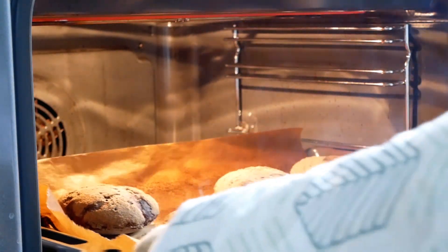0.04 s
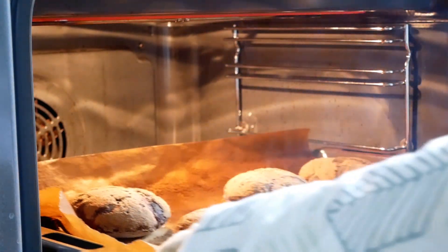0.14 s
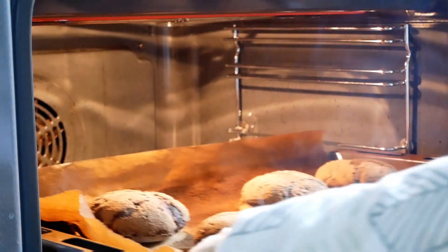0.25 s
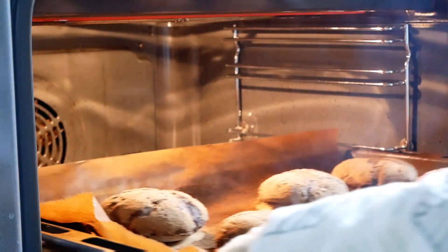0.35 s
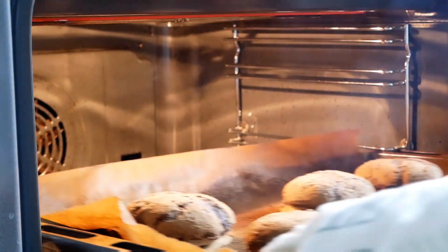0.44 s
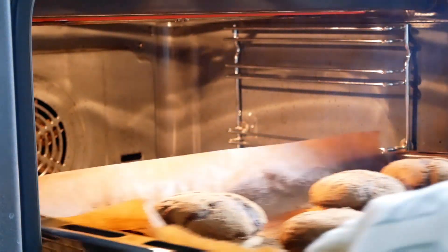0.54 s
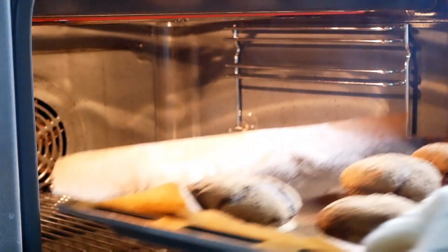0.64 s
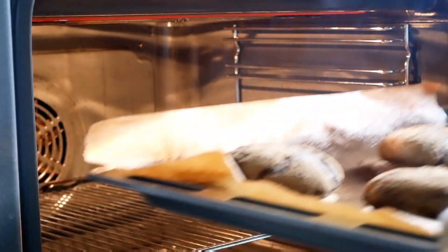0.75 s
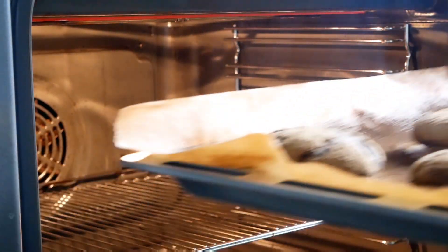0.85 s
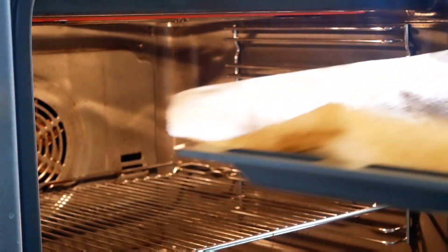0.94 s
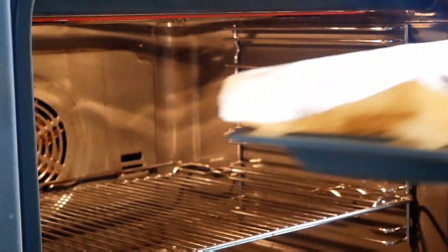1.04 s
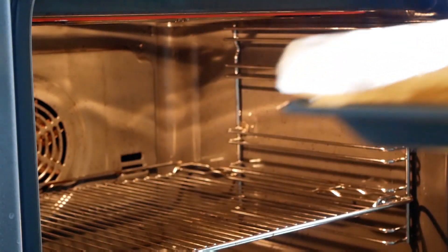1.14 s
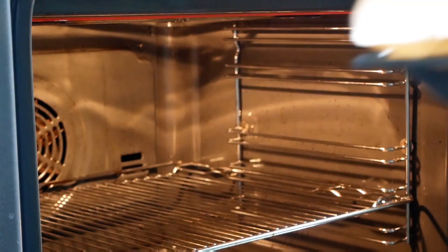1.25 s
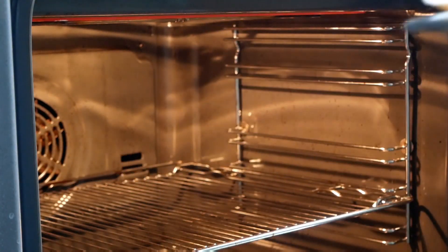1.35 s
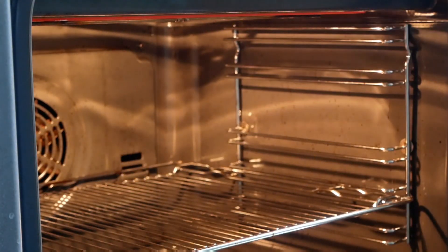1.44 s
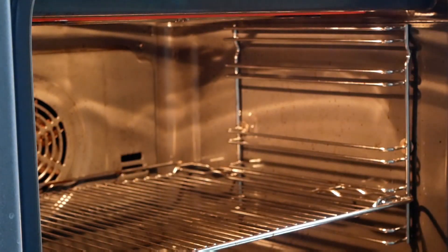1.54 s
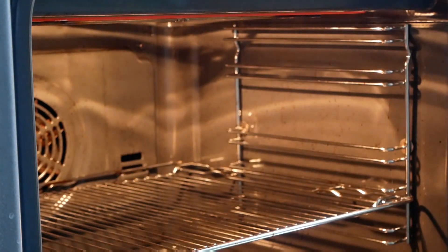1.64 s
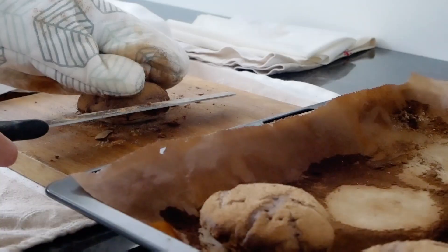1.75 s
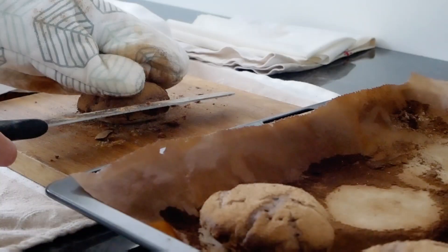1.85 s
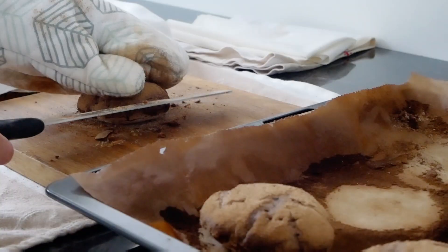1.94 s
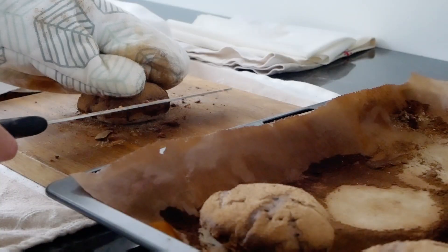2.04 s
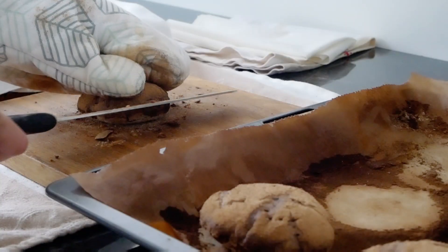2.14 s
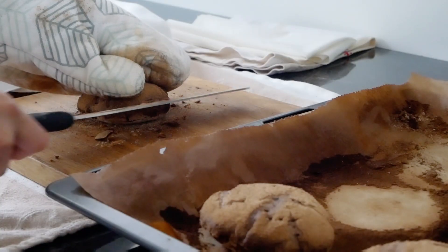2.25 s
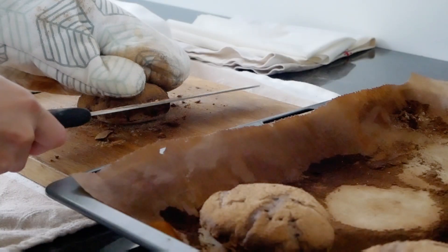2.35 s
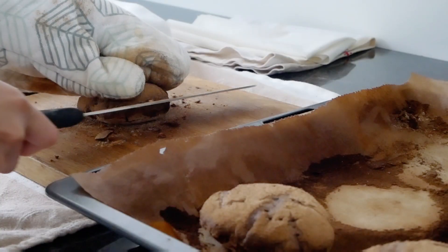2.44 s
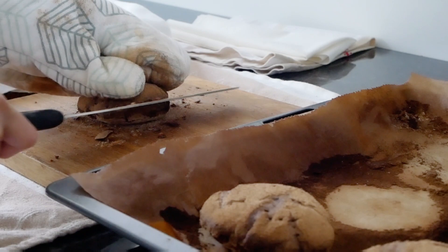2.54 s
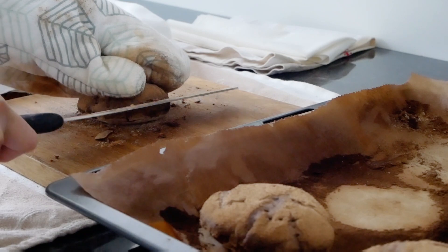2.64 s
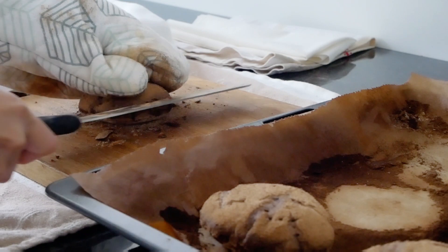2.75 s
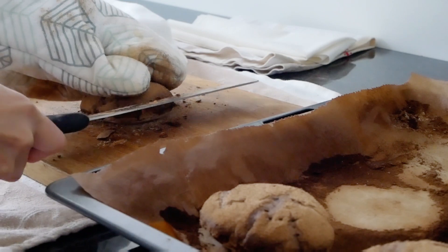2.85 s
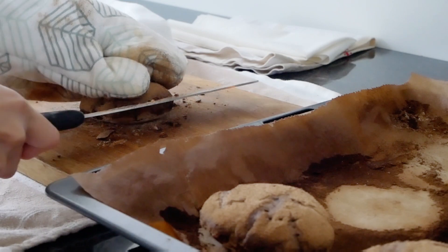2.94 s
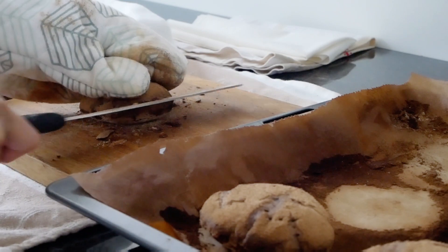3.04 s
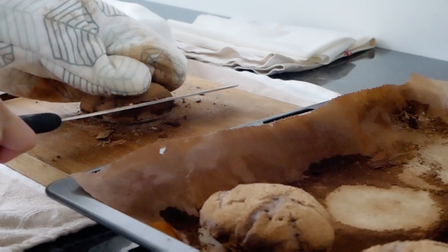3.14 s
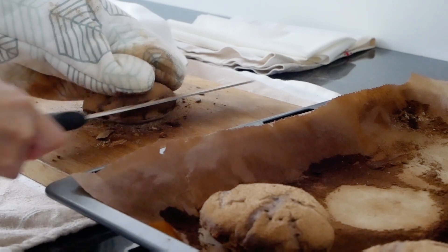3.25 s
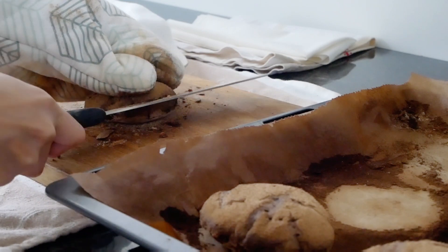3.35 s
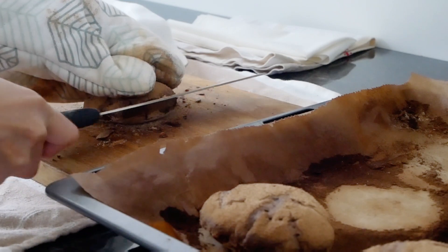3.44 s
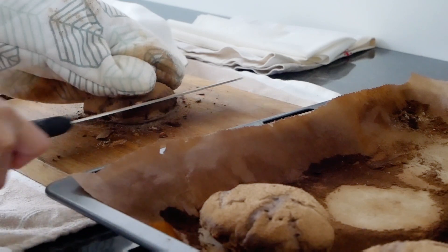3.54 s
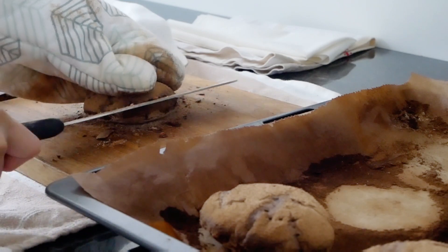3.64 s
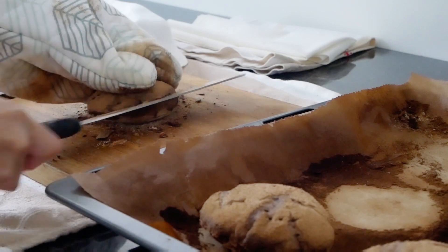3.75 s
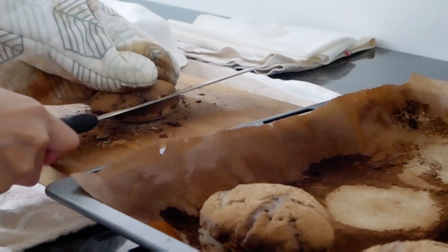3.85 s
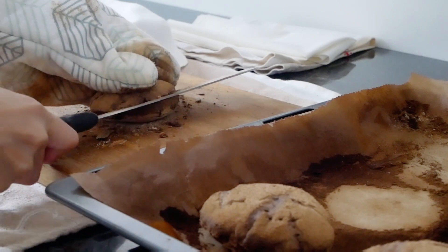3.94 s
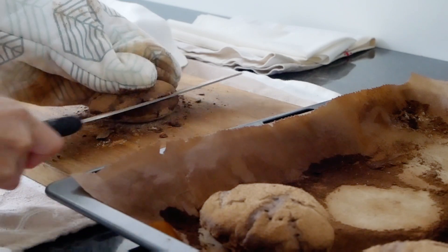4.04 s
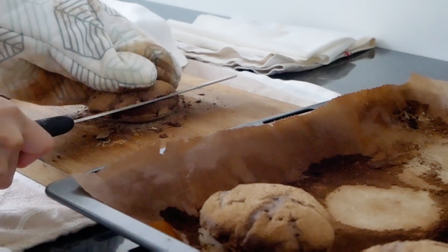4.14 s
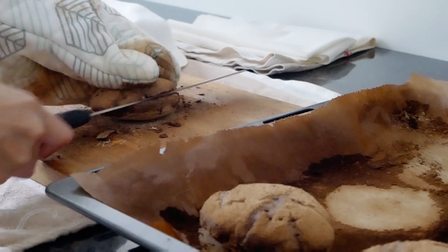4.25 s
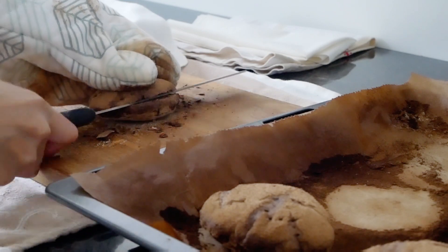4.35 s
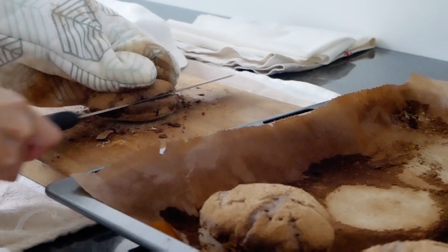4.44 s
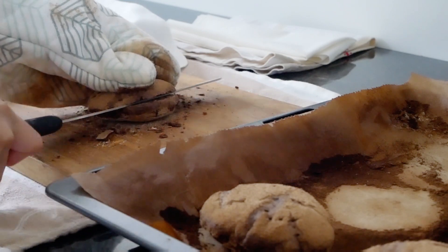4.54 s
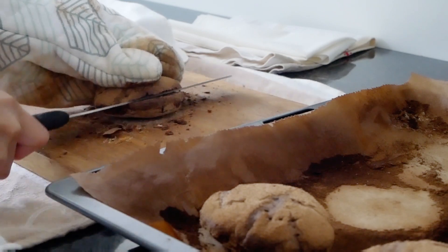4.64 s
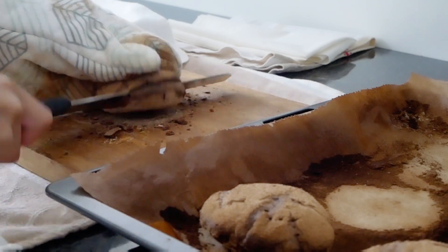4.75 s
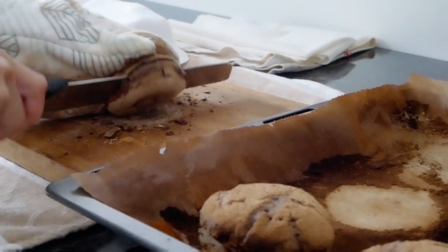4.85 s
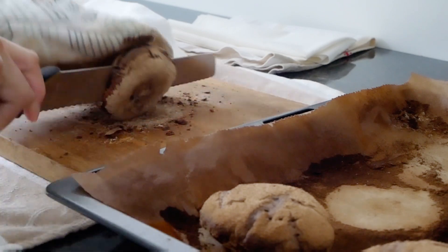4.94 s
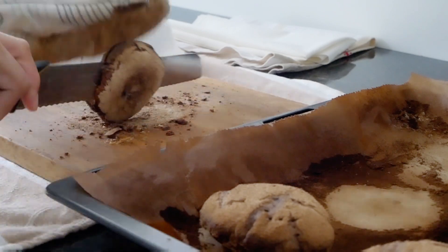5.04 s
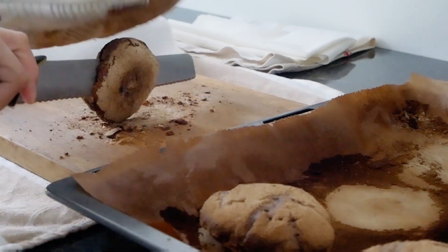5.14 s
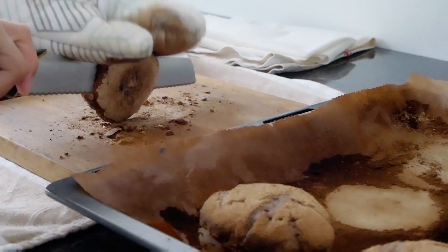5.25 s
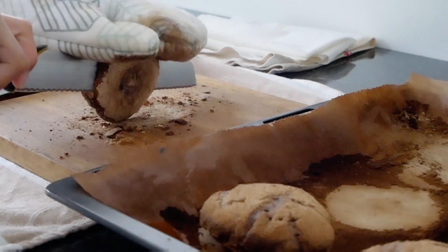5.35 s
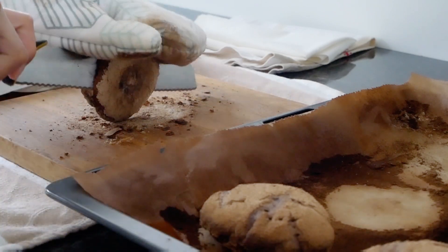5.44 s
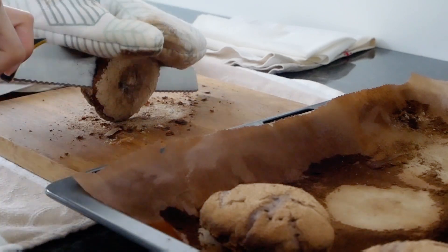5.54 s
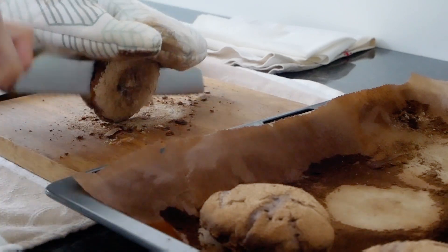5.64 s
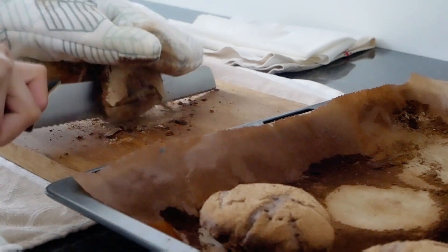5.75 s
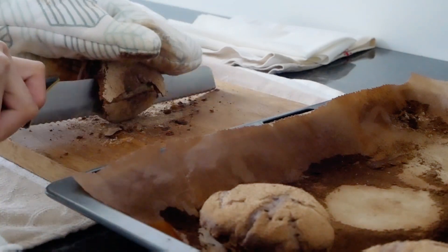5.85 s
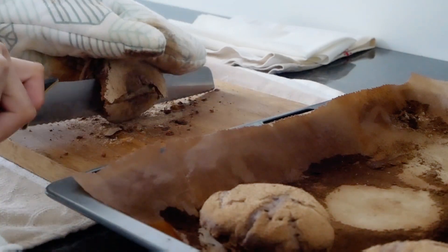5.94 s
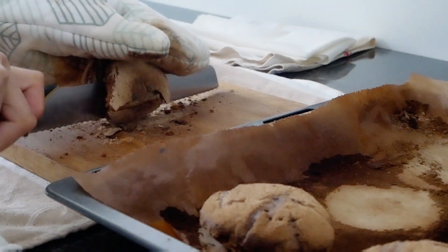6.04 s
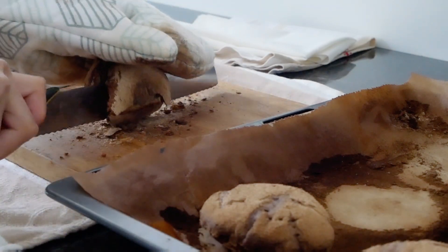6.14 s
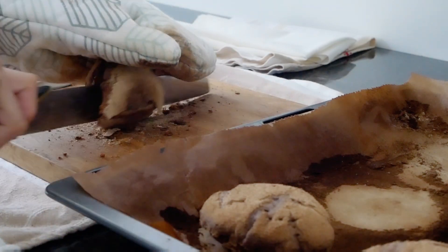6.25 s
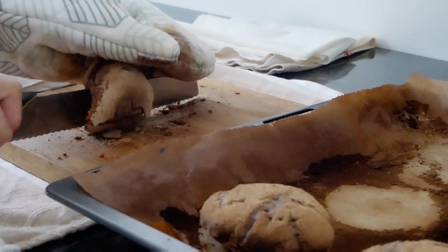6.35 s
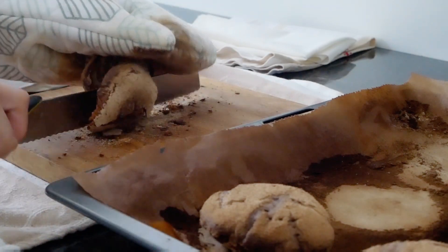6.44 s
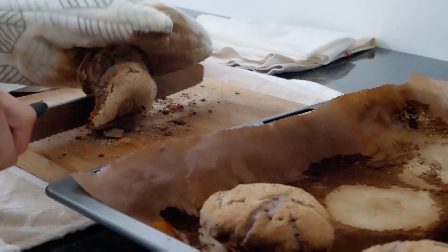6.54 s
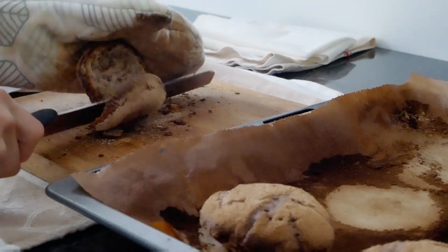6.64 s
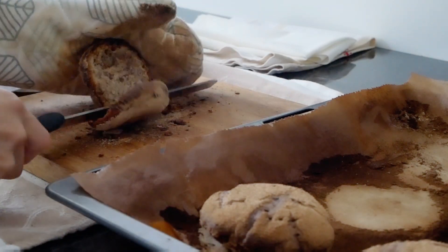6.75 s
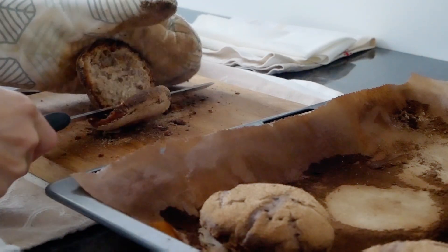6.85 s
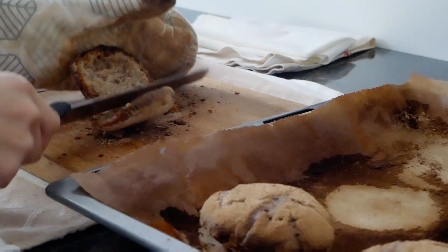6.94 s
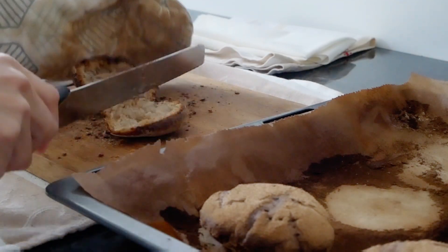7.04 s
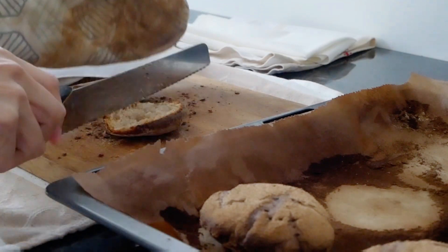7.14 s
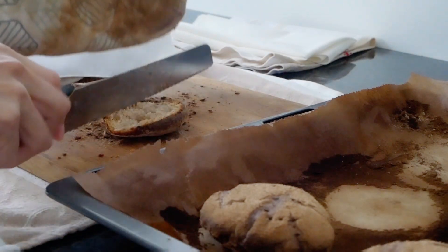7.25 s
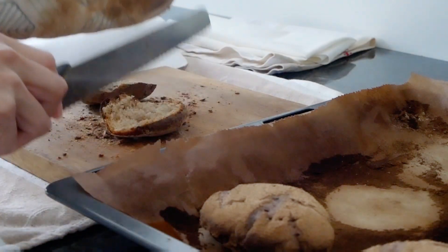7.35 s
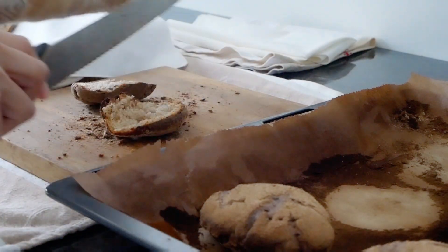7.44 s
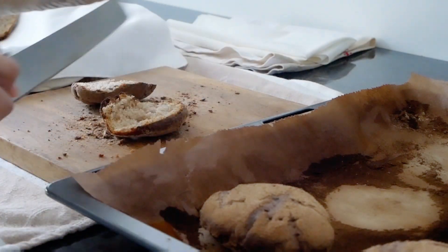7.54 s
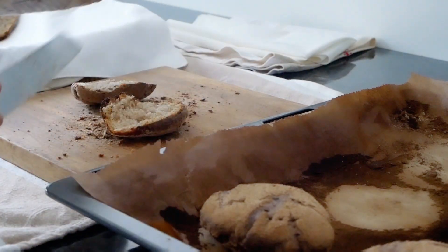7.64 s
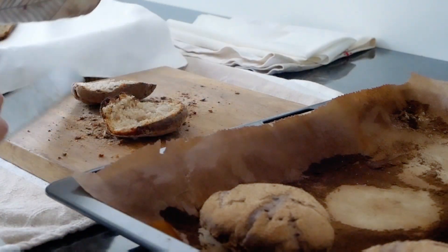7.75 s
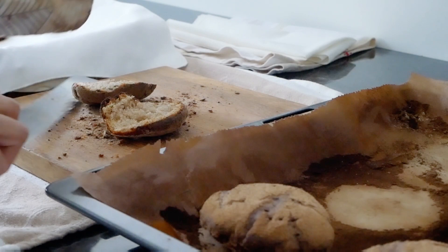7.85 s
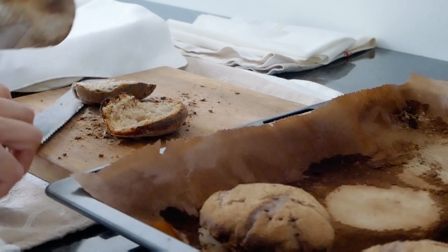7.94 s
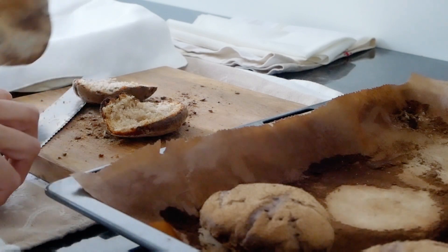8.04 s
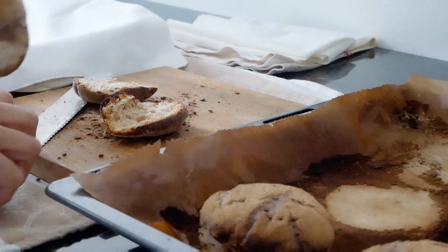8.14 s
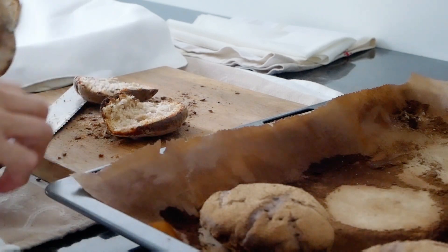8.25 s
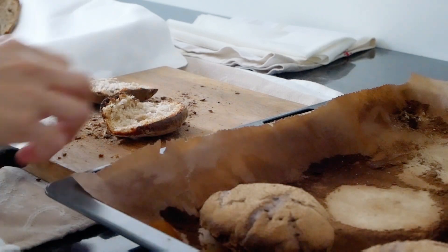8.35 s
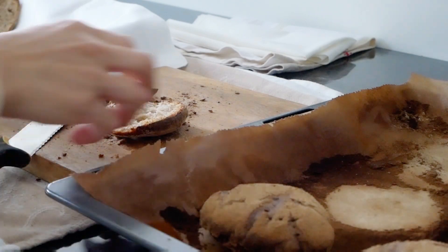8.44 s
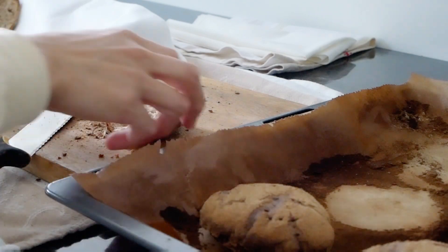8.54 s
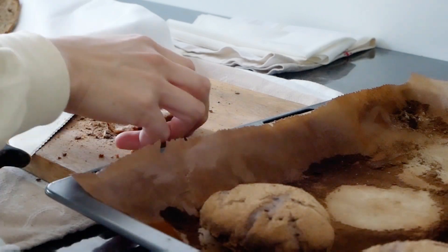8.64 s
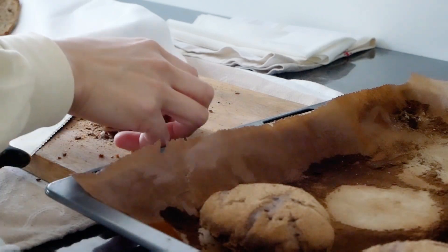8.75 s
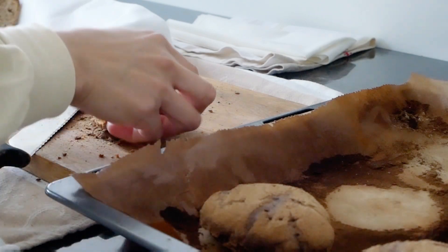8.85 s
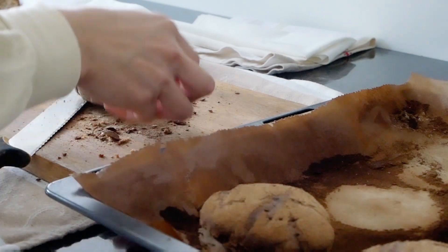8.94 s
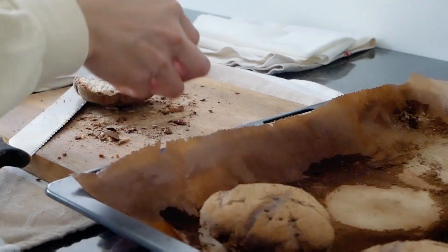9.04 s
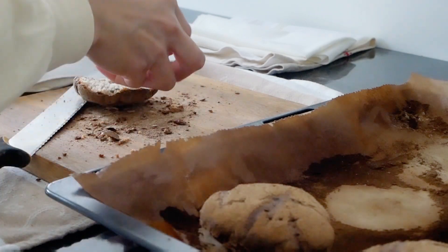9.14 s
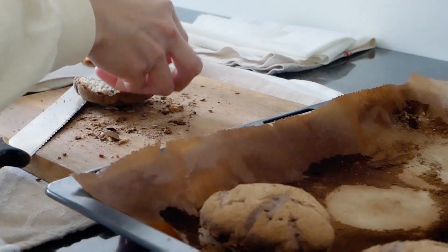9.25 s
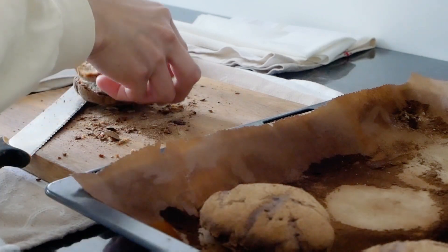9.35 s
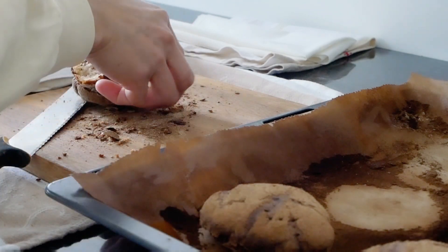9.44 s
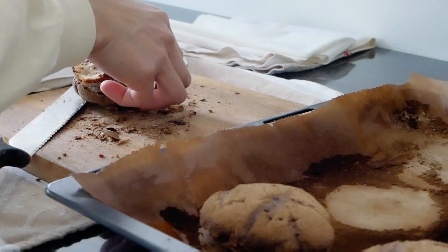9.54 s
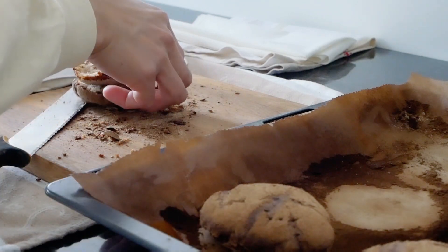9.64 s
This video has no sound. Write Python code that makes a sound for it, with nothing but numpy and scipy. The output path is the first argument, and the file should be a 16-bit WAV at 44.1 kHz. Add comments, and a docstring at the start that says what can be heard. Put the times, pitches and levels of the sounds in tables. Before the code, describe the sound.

Close, dry stereo sound in a small hard kitchen. From 0 s baking paper rustles and a metal tray scrapes on oven rails; it knocks at 0.15 s and bangs hardest at 0.5 s with a short ringing and hollow boom. Paper crackles on from 1.0 to 1.75 s, with snaps near 1.4 s, over a low oven rumble. At 1.77 s it cuts abruptly to a quieter room tone with faint brushing. From 2.3 to 4.9 s a serrated knife saws a crusty roll, starting softer, then in brisk alternating strong and weak strokes full of bright cracks, with blade rasp and woody resonance. Small ticks follow, then a sharp tearing crunch at 5.8 s and more crackling from 6.1 to 6.7 s. Bread drops with soft thuds around 7.2-7.5 s; a handle taps at 7.9 s and the knife clinks flat at 8.17 s. Faint hand and crumb touches end it near 9.6 s.

```python
"""Sawing and tearing a crusty roll after the oven

A metal tray with baking paper scrapes and bangs out of an oven, made from noise ticks, struck modes and paper snaps.
Then, at a wooden board, a serrated knife saws a crusty roll and the crust is torn: hails of tiny cracks, with
blade and board tones. Single cracks are short bursts. Bread, knuckles and the knife land on the board as blows.
A phone with two ports hears both from close by in a small hard kitchen, over a low steady rumble of shaped noise."""
import sys
import numpy as np
from scipy import signal
from scipy.fft import rfft, irfft, next_fast_len
from scipy.io import wavfile

SR = 44100
rng = np.random.default_rng(int(sys.argv[2]) if len(sys.argv) > 2 else 0)


def to_wav(sig):
    """Store sig (one row per channel, or 1-D mono) as 16-bit WAV at the path in sys.argv[1].

    Samples outside -1..1 are clipped; the rate is SR.
    """
    pcm = np.clip(np.atleast_2d(sig), -1, 1) * 32767
    pcm = np.round(pcm).astype(np.int16)
    wavfile.write(sys.argv[1], SR, pcm.T)  # frames by channels


N = 427329
SIZE = next_fast_len(N + SR)  # spare room at the end, for the tails
BINS_HZ = np.maximum(np.arange(SIZE // 2 + 1) * SR / SIZE, 1)
T = np.arange(N) / SR  # time in s

# Levels in the tables are those before the room and the final filters.

# knife strokes to and fro, then tearing of the crust from 5.77 s: (start_s, rise_s, hold_s, crust_db,
# blade_minus_crust_db, board_minus_crust_db, blade_favourite_hz, board_favourite_hz)
STROKES = [(2.308, 0.12, 0.053, -36, -3.5, 1.5, 1400, 312),
           (2.543, 0.071, 0.085, -38.5, -6.5, 3, 1700, 260), (2.736, 0.11, 0.13, -34, -11.5, -1, 1990, 427),
           (3.063, 0.11, 0.051, -37.5, -7, 3, 2000, 232), (3.314, 0.062, 0.11, -28, -7.5, -6, 2010, 325),
           (3.561, 0.086, 0.085, -34, -3, -2, 1760, 283), (3.815, 0.06, 0.11, -27.5, -4, -8, 1980, 360),
           (4.05, 0.1, 0.094, -34.5, -1.5, -1, 1840, 290), (4.316, 0.029, 0.091, -27.5, -4, -8, 1920, 380),
           (4.475, 0.11, 0.063, -35, 0, -3, 1840, 300), (4.729, 0.054, 0.0073, -31, -4, -10.5, 2050, 349),
           (4.869, 0.049, 0.046, -41.5, -0.5, -7, 1740, 300),
           (5.007, 0.031, 0.047, -48.5, -5, -3.5, 1760, 320),
           (5.773, 0.01, 0.044, -27, -4.5, -5, 1900, 403),
           (5.849, 0.0065, 0.011, -30.5, 0.5, -5, 1560, 420), (6.103, 0.023, 0.13, -47, 0, -3.5, 1700, 350),
           (6.267, 0.1, 0.024, -33.5, -4.5, -8, 1700, 396), (6.399, 0.035, 0.028, -36.5, -3, -7, 1670, 400),
           (6.543, 0.034, 0.12, -48, -2.5, -4, 1660, 345)]
# mitt, hands and crumbs brushing roll and board:
# (start_s, rise_s, hold_s, crust_db, blade_minus_crust_db, board_minus_crust_db)
TOUCHES = [(1.854, 0.0095, 0.0071, -62, 6, 15), (1.944, 0.053, 0.15, -65, -13, 10.5),
           (5.145, 0.019, 0.025, -56.5, 3.5, 3), (5.3, 0.13, 0.081, -61, -1, 2),
           (5.56, 0.049, 0.12, -60, -6, -13), (5.919, 0.029, 0.027, -43, 3, 0),
           (6.734, 0.013, 0.17, -56, 0.5, -3), (6.95, 0.067, 0.17, -63, 2, -1),
           (7.192, 0.029, 0.17, -57, -2, 5.5), (7.42, .05, 0.021, -67, 7.5, 12),
           (7.921, 0.011, 0.036, -63.5, 11, 25), (8.02, 0.086, 0.058, -56.5, -3, 6),
           (8.16, 0.0064, 0.0063, -46.5, -8, -3), (8.79, 0.035, 0.037, -59.5, 0.5, -1),
           (8.945, 0.012, 0.021, -62.5, -6.5, 3), (9.458, 0.066, 0.024, -65.5, 6, 9),
           (9.566, 0.012, 0.0082, -64, 9, 15)]
# how fast treble, middle and bass die away when a movement stops: (treble, middle, bass), all in dB per s
STROKE_FALL_DB_S = (276.5, 179.5, 159)
TOUCH_FALL_DB_S = (158, 86, 95)
# colour of the breaking crust: (pitch_hz, level_db per Hz)
CRUST = [(1760, -32), (3000, -1.5), (3750, 1.5), (5080, 0.5), (6110, -3.5), (7070, 3.5), (9020, 4.5),
         (12200, -9.5), (12600, -38), (13000, -99)]
# ringing tones of the blade and of the wooden board: (pitch_hz, level_db, t60_s)
BLADE_MODES = [(825, 1, 0.011), (1190, -4, 0.0092), (1435, 2.5, 0.0072), (1780, -3.5, 0.0078),
               (2136, 6, 0.0041), (2540, 3.5, 0.0051)]
BOARD_MODES = [(139, -15, 0.08), (199, -18, 0.032), (244, 2.5, 0.035), (276, -0.5, 0.073), (316, 9, 0.058),
               (410, 7.5, 0.06), (494, 11.5, 0.03), (584, 6.5, 0.054), (735, -14, 0.053),
               (907, -13.5, 0.028)]


def sawing_and_tearing():
    """The crust breaks in a hail of tiny cracks; the same movements shake blade and board."""
    strokes = np.array(STROKES)
    stroke_gains = movements(strokes[:, :6], STROKE_FALL_DB_S)
    touch_gains = movements(TOUCHES, TOUCH_FALL_DB_S)
    crust_gain, blade_gain, board_gain = np.hypot(stroke_gains, touch_gains)
    blade_hz, board_hz = strokes.T[6:]

    breaks = grains(per_s=900., spread_db=3.5, bed_db=5.5, t60=0.005, fill_db=-6.5, apart=0.31)
    # blade layer delayed 3 ms so the two bands add without cancelling
    delayed = np.roll(breaks, SR // 300, axis=1)
    # the soft crumb passes only a smeared push down to the wood
    push = grains(per_s=520.0, spread_db=-0.5, bed_db=11.5, t60=0.039, fill_db=-14.5, apart=0)[0]

    crust = through((crust_gain * breaks, causal(CRUST)))
    saw = patchy(crust, split_hz=5400.0, shift_db=2.54, per_s=30.)
    saw += driven(blade_gain * delayed, BLADE_MODES, blade_hz, octave_db=13.8, shift_db=3.44, per_s=14.)
    saw += driven(board_gain * push, BOARD_MODES, board_hz, octave_db=7.6, shift_db=1.1, per_s=7.4)
    top_cut = signal.butter(16, 12500, fs=SR, output="sos")  # Hz
    return signal.sosfilt(top_cut, saw)


def driven(push, modes, near_hz, octave_db, shift_db, per_s):
    """Each movement favours the modes near one pitch; each mode's level also wanders at random."""
    stroke = np.maximum(np.searchsorted(np.transpose(STROKES)[0], T) - 1, 0)  # number of the latest movement
    out = 0
    for hz, db, t60 in modes:
        pole = 1000. ** (-1 / t60 / SR) * np.exp(2j * np.pi * hz / SR)
        octaves_away = np.abs(np.log2(hz / near_hz))
        level_db = (db - octave_db * octaves_away)[stroke] + shift_db * wander(per_s)
        # this two-pole filter rings at hz and dies away over t60
        out = out + signal.lfilter([0, pole.imag], [1, -2 * pole.real, abs(pole) ** 2], push * undb(level_db))
    energy = sum(undb(2 * db) * t60 * SR / 4 / np.log(1000) for _, db, t60 in modes)
    return out / np.sqrt(energy)


# single crust cracks, loud and faint: (time_s, peak_db, deep_part_minus_peak_db)
CRACKS = [(1.8731, -37, -1), (1.887, -42, -9), (1.9624, -48, -9), (2.2024, -49, -9), (2.2734, -33, -16),
          (2.3175, -37, -12), (2.3485, -33, -19), (2.3825, -22, -8), (2.4037, -17, -16), (2.4385, -11, -18),
          (2.548, -31, -7), (2.607, -17, -10), (2.7117, -14, -17), (2.8479, -29, -15), (2.8742, -21, -14),
          (2.8938, -15, -7), (2.944, -14.5, -9), (3.1116, -22, -9), (3.1542, -21, -14), (3.305, -26, -6),
          (3.3352, -27, -9), (3.3507, -17, -20), (3.401, -8, -16), (3.4484, -13.5, -9), (3.473, -22, -9),
          (3.503, -23, -9), (3.6077, -22.5, -1), (3.63, -22.5, 0.5), (3.7758, -18.5, -9), (3.833, -22, 0),
          (3.86, -16, -8), (3.8711, -20, -4), (3.912, -11.5, -0.5), (3.9442, -13, -6), (3.9646, -11, -1),
          (3.9769, -12.5, -0.5), (4.14, -24, -4), (4.157, -22, -13), (4.2085, -18, -3), (4.329, -11.5, -3),
          (4.3457, -13, -12), (4.3528, -21, -9), (4.3774, -12, -6), (4.4053, -15.5, -7.5), (4.411, -19, -6),
          (4.5689, -30, -4), (4.6244, -20, -3), (4.701, -21.5, -5), (4.7726, -11, -8), (5.0293, -30, -12),
          (5.1753, -39, -5), (5.2012, -35, -9), (5.417, -42, -9), (5.6048, -30.5, -9), (5.6305, -35.5, -7),
          (5.665, -40, -9), (5.6799, -35, -9), (5.7615, -37.5, -10.5), (5.7725, -13, -11.5),
          (5.7845, -12, -14), (5.8008, -23, -12.5), (5.8086, -12.5, -7.5), (5.813, -11, -12),
          (5.8169, -9, -6), (5.8615, -13, -9), (5.889, -8.5, -11.5), (5.9524, -27, 0), (6.133, -31, -3),
          (6.157, -12.5, -6), (6.18, -28, -11), (6.208, -25.5, -6), (6.2408, -28, -9), (6.2893, -26.5, -3),
          (6.299, -31, -9), (6.3183, -23, -10), (6.371, -20, -9.5), (6.389, -17, -14), (6.3943, -12, -9),
          (6.4233, -30, -9), (6.436, -19.5, -12), (6.451, -16, -12), (6.463, -14, -11), (6.604, -21.5, -9),
          (6.6394, -20, -9), (6.6644, -20, -8.5), (6.7064, -26, -15), (6.8273, -36, -9), (6.8991, -39, -7),
          (7.2172, -34.5, -7), (7.2545, -36.5, -2), (7.3199, -20.5, -6.5), (7.9357, -42, -13),
          (7.9773, -48, -12), (8.053, -37, -11), (8.1695, -20, -12), (8.8428, -49, -6), (8.956, -45, -9),
          (9.5238, -48, -11), (9.5777, -40, -3)]
# colours of the sharp snap and of the deeper split: (pitch_hz, level_db per Hz)
SNAP_OF_CRUST = [(2500, -29), (4200, -7), (6060, -2), (8390, 12.5), (10700, 0), (12300, -9), (13300, -51)]
SPLIT_OF_CRUST = [(530, -6), (1000, -2.5), (2000, 0), (4000, 4.5), (6000, 3), (9000, -35)]


def crust_cracks():
    """The crust gives way: each crack is a sharp snap together with a deeper split."""
    s, db, deep_db = np.transpose(CRACKS)
    splinter_t60_s = 0.009
    snap = blows(s, db, causal(SNAP_OF_CRUST), splinter_t60_s, fill_db=-9.5)
    split = blows(s, db + deep_db, causal(SPLIT_OF_CRUST), splinter_t60_s, fill_db=6.0)
    return snap + split


# bread, knife handle and knuckles landing on the board:
# (time_s, peak_db, sharp_edge_minus_peak_db, tumble_t60_s, contact_s)
KNOCKS = [(6.95, -44, 6, 0.024, 0.001), (7.222, -40, -14, .04, 0.0013), (7.236, -31, -20, 0.03, 0.00086),
          (7.32, -26, -11, 0.026, 0.002), (7.352, -32, -18, 0.024, 0.0015), (7.411, -35, -10, .04, .0012),
          (7.453, -35.5, -18, .02, 0.0013), (7.936, -32.5, -6, 0.033, 0.00026),
          (7.967, -42, -24, .03, 0.0015), (8.008, -39, -7, 0.079, .0012),
          (9.578, -46.5, 7.5, 0.058, 0.0012), (9.6, -48, 3, 0.031, .0012)]


def board_knocks():
    """A landing wakes the board most near one pitch; a longer contact softens it; its sharp edge uses blade tones."""
    favourite_hz, octave_db = 290, 32  # modes lose this many dB per octave away from the favourite
    woken = [(hz, db - octave_db * abs(np.log2(hz / favourite_hz)), t60) for hz, db, t60 in BOARD_MODES]
    s, db, edge_db, t60, contact = np.transpose(KNOCKS)
    thud = blows(s, db, ring(woken), t60, fill_db=-15.0, contact=contact)
    edge = blows(s, db + edge_db, ring(BLADE_MODES), t60, fill_db=-7.0)
    return thud + edge


# the knife landing flat on the board, then one bounce: (time_s, peak_db)
LAID = [(8.169, -25), (8.181, -34)]
# ringing tones of the whole knife: (pitch_hz, level_db, t60_s)
KNIFE_MODES = [(175, -1, 0.15), (1180, -10, 0.018), (1470, -10, 0.023), (3140, -6, 0.022), (5790, -21, 0.2),
               (5670, -16, 0.22), (6760, -14, 0.11), (7063, -20.5, .23), (7750, -21, .2), (8425, -34, .2),
               (8931, -28, 0.16), (9100, -5.5, 0.044)]


def knife_laid_down():
    """The knife is laid flat and bounces once; each hit sets its metal ringing."""
    s, db = np.transpose(LAID)
    return blows(s, db, ring(KNIFE_MODES), 0.011, fill_db=-2.0)


# pulls of the tray and rustles of its paper:
# (start_s, rise_s, hold_s, paper_db, rails_minus_paper_db, oven_body_minus_paper_db)
PULLS = [(-.03, 0.038, 0.017, -39.5, 1.5, -1.5), (.09, 0.061, 0.024, -34, 0, -3.5),
         (.2, 0.07, 0.077, -44, 7.5, -0.5), (.32, 0.064, 0.011, -41.5, 10.5, -18),
         (.506, 0.002, 0.045, -29.5, 0.5, -0.5), (.6, 0.029, 0.071, -38.5, 2.5, 0),
         (.8, 0.027, 0.052, -57, 6.5, 11), (.98, 0.12, 0.035, -38, -0.5, -6),
         (1.17, 0.072, 0.07, -35.5, -5, -10.5), (1.31, 0.073, 0.041, -30, -4, -17),
         (1.585, 0.019, 0.0095, -37, -2.5, -6.5), (1.68, 0.075, .04, -35.5, -7.5, -8)]
# how fast a pull dies away once it stops: (treble, middle, bass), all in dB per s
PULL_FALL_DB_S = (174, 161, 76)
# colours of the baking paper, the rails and the oven body: (pitch_hz, level_db per Hz)
PAPER = [(2060, -2.5), (3500, 8), (4740, 10), (6650, 10.5), (7230, 8.5), (9340, 14), (10800, 10),
         (13300, -4), (14000, -10.5), (14500, -25)]
RAILS = [(610, -21.5), (910, -3), (1270, 0), (2170, 1), (2800, 0.5), (4300, -8), (7100, -25.5),
         (12100, -73)]
OVEN_BODY = [(35, -56.5), (60, 1.5), (140, 2), (204, -15), (253, -4), (655, -4.5), (718, -8), (900, -7.5),
             (1170, -29.5), (1980, -120)]


def tray_scraping():
    """Rails and paper rub in dense slips, which also shake the oven body."""
    size = 2 * SR
    paper_gain, rails_gain, body_gain = (gain[:size] for gain in movements(PULLS, PULL_FALL_DB_S))
    slips = grains(per_s=700.0, spread_db=1.0, bed_db=4.0, t60=0.0096, fill_db=-12.0, apart=0.22, size=size)
    # rails layer delayed 3 ms so it adds to the paper without cancelling
    delayed = np.roll(slips, SR // 300, axis=1)
    paper = through((paper_gain * slips, causal(PAPER)))
    metal = through((rails_gain * delayed, causal(RAILS)), (body_gain * slips, causal(OVEN_BODY)))
    return patchy(paper, split_hz=5100.0, shift_db=2.6, per_s=20.56) + metal


# tray knocking on rails and rack: (time_s, ring_peak_db, clack_minus_ring_db, boom_minus_ring_db)
BANGS = [(0.1431, -14, -7, -35), (0.5094, -14, 3.5, -9.5), (0.5442, -18, -11.5, -8),
         (0.593, -35.5, -8, 9.5), (0.8269, -34, 2, -21), (1.3762, -35, 11, -33.5),
         (1.4115, -33, -22, -40.5), (1.5986, -36, -2, -18)]
# ringing tones of the tray: (pitch_hz, level_db, t60_s), lowest first
TRAY_MODES = [(145.5, -6.5, 0.21), (263, -5, 0.49), (305, -3.5, 0.077), (590, -9, 0.46), (658, -12, 0.31),
              (727, -5, 0.067), (1240, -0.5, .15), (1360, 8.5, 0.061), (1750, 0.5, 0.054), (2440, -9, 0.04),
              (2580, 9, 0.074), (2960, 7, 0.087), (3147, 13, 0.037)]


def tray_bangs():
    """At every knock the sheet rings, rails and paper clack, and the six lowest tones of the sheet boom."""
    s, db, clack_db, boom_db = np.transpose(BANGS)
    ringing = blows(s, db, ring(TRAY_MODES), 0.03, fill_db=17.0)
    clack = blows(s, db + clack_db, causal(RAILS) + causal(PAPER), 0.071, fill_db=0.5)
    boom = blows(s, db + boom_db, ring(TRAY_MODES[:6]), 0.05, fill_db=38.0)
    return ringing + clack + boom


# snaps of the baking paper: (time_s, peak_db)
SNAPS = [(0.0246, -22), (0.121, -19.5), (0.144, -11), (0.512, -14.5), (0.5424, -12.5), (1.0786, -26),
         (1.099, -21.5), (1.147, -20), (1.217, -26), (1.26, -19), (1.3054, -22), (1.374, -12.5),
         (1.4119, -11.5), (1.595, -17), (1.613, -21), (1.66, -28), (1.7105, -31), (1.731, -22.5)]


def paper_snaps():
    """Baking paper snaps: short bursts in the colour of the paper."""
    s, db = np.transpose(SNAPS)
    return blows(s, db, causal(PAPER), 0.03, fill_db=-8.0)


def movements(rows, falls_db_s):
    """Gains for treble, middle and bass: every movement rises, holds, falls and leaves a fainter, longer trickle."""
    rise_db = 17  # climb from the start of a movement to its full level
    trickle_db, trickle_fall_db_s = -14, 65
    power = np.zeros((3, N))
    for start, rise, hold, top_db, mid_db, low_db in rows:
        rise = max(rise, .002)
        # a faint climb begins before the start
        span = slice(max(int((start - 3 * rise) * SR), 0), int((start + rise + hold + 1) * SR))
        climb_db = rise_db * np.minimum((T[span] - start) / rise - 1, 0)
        after = np.maximum(T[span] - start - rise - max(hold, 0), 0)  # s since the movement stopped
        fall = undb(-2 * np.outer(falls_db_s, after))
        fall = fall + undb(2 * (trickle_db - trickle_fall_db_s * after))
        levels_db = top_db + np.array([0, mid_db, low_db])
        power[:, span] += undb(2 * np.add.outer(levels_db, climb_db)) * fall
    return np.sqrt(power)


def grains(per_s, spread_db, bed_db, t60, fill_db, apart, size=N):
    """Random ticks of varied strength, each with a fresh tail of splinters, over an even bed of rubbing."""
    chance = rng.random((3, size))
    happens = chance[0] < per_s / SR
    strength = undb(-spread_db * np.log(chance[2] + 0.024))
    ticks = unit(happens * strength)
    sign = np.sign(chance[1] - .5)
    tail_power = signal.lfilter([1], [1, -1000. ** (-2 / t60 / SR)], ticks ** 2)
    # the rubbing is spread over a width, so a share of it differs between the two ports
    mid, side = rng.standard_normal((2, size))
    hiss = mid + apart * side * np.array([[1], [-1]])
    hiss_gain = np.sqrt(undb(2 * fill_db) * tail_power + undb(2 * bed_db))
    return unit(ticks * sign + hiss_gain * hiss)


def burst(t60, fill_db):
    """One break: a sharp tick and a short tail of splinters."""
    t = T[:SR // 4]
    tail = undb(fill_db) * rng.standard_normal(len(t)) * 1000. ** (-t / t60)
    tail[0] = 1
    return tail


def blows(times, peak_db, body, t60, fill_db, contact=0.):
    """Each blow has its own burst, softened by the contact time, coloured by the body and set to its peak."""
    out = np.zeros(N + 2 * SR)
    for s, db, fade, soft in np.broadcast(times, peak_db, t60, contact):
        fade = max(fade, .002)
        cushion = np.hanning(max(int(soft * SR), 0) + 3)[1:-1]
        force = np.convolve(burst(fade, fill_db)[:int(fade * SR) + 2], cushion)
        hit = signal.fftconvolve(force, body)
        i = int(s * SR)
        out[i:i + len(hit)] += undb(db) * hit / np.abs(hit).max()
    return out[:N]


def ring(modes):
    """A struck body answers with a sum of dying tones; energy 1."""
    t = T[:SR // 2]
    response = sum(undb(db) * np.sin(2 * np.pi * hz * t) * 1000. ** (-t / t60) for hz, db, t60 in modes)
    return response / np.sqrt(np.sum(response ** 2))


def causal(table, size=2048):
    """Short response with the table's colour that starts at once, by folding the cepstrum; energy 1."""
    log_spectrum = np.log(undb(over_hz(table)))
    cep = irfft(log_spectrum[::SIZE // (2 * size)][:size + 1])
    cep[1:size] *= 2
    cep[size + 1:] = 0
    response = irfft(np.exp(rfft(cep)))
    return response / np.sqrt(np.sum(response ** 2))


def through(*pairs):
    """Sum of sounds, each convolved with its own response; silence fills up the rest."""
    out = np.zeros((2, N))
    for x, response in pairs:
        length = x.shape[1]
        out[:, :length] += signal.oaconvolve(x, response[None], axes=1)[:, :length]
    return out


def patchy(x, split_hz, shift_db, per_s):
    """The colour keeps changing: the parts below and above the split flicker each on its own."""
    low = signal.sosfilt(signal.butter(2, split_hz, fs=SR, output="sos"), x)
    high = x - low
    return low * undb(shift_db * wander(per_s)) + high * undb(shift_db * wander(per_s))


def wander(per_s):
    """Random levels joined by straight lines."""
    count = int(per_s * N / SR) + 2
    return np.interp(T, np.arange(count) / per_s, rng.standard_normal(count))


def undb(db):
    """Decibels to a plain gain."""
    return 10 ** (np.asarray(db) / 20)


def unit(x):
    """Scale to an RMS level of 1."""
    return x / np.sqrt(np.mean(x ** 2))


def over_hz(table):
    """A (pitch_hz, value) table on the frequency bins."""
    hz, value = np.transpose(table)
    return np.interp(np.log(BINS_HZ), np.log(hz), value)


# difference between the two ports: (pitch_hz, left_minus_right_db)
PORT_DB = [(60, 4.5), (110, -3), (200, -7), (370, -10), (680, -9), (1260, -4.5), (2310, -1), (4250, -0.5),
           (7800, 2.5), (14300, 0.5)]
# how far the left port leads: (pitch_hz, lead in radians)
PORT_PHASE = [(30, -0.23), (260, -0.27), (860, 0.89), (3270, -0.14), (8000, 0.64), (12000, -0.68)]


def room(dry, t60, wet_db, per_s):
    """Each port has its own colour and lag, plus four random tails that blend in turn, so no single colour stays."""
    half = undb(over_hz(PORT_DB) / 2) * np.exp(.5j * over_hz(PORT_PHASE))
    ports = np.array([half, 1 / half])
    t = T[:SR // 2]
    turns = np.array([wander(per_s) for _ in range(4)])
    heard = rfft(dry, SIZE)
    for share in turns / np.sqrt(np.sum(turns ** 2, axis=0)):
        tail = rng.standard_normal((2, len(t))) * 1000. ** (-t / t60) * (t > .001)
        tail = tail / np.sqrt(np.sum(tail ** 2) / 2)
        heard = heard + undb(wet_db) * rfft(tail, SIZE) * rfft(share * dry, SIZE)
    return irfft(heard * ports / np.abs(ports.mean(axis=0)), SIZE)[:, :N]


# background noise at the two ports: (pitch_hz, left_minus_right_db)
AIR_DB = [(60, -17.5), (110, -9), (200, -4), (370, -6), (680, -2), (1260, -1), (2310, 0), (4250, 1),
          (7800, 2), (14300, -0.5)]
# how alike the noise is at the two ports: (pitch_hz, likeness: 1 same, 0 unrelated, below 0 opposed)
AIR_ALIKE = [(60, -0.017), (130, 0.083), (290, 0.52), (630, -0.079), (1370, -0.29), (3000, 0.42),
             (6560, 0.48), (14300, 0.15)]
# colour of the background at the oven and at the board: (pitch_hz, level_db per Hz, only the shape counts)
OVEN_AIR = [(30, -14), (296, 1), (534, -4), (592, -17), (806, -5), (1040, -22.5), (1190, -13),
            (6990, -29.5), (9040, -41), (14000, -42)]
KITCHEN = [(30, -48.5), (82, 1), (181, -7), (320, -1), (534, -13.5), (747, -12), (917, -19), (1330, -21.5),
           (1460, -16), (1600, -23.5), (2770, -27), (6310, -37), (8370, -35), (11700, -44.5), (14000, -76)]


def air(table, db):
    """Steady rumble and hiss from shaped noise, partly alike at the two ports, swelling a little."""
    alike = np.clip(over_hz(AIR_ALIKE), -.95, .95)
    mid, side = rfft(rng.standard_normal((2, SIZE))) * np.sqrt([1 + alike, 1 - alike])
    tilt = undb(over_hz(AIR_DB) / 2)
    spectrum = np.array([(mid + side) * tilt, (mid - side) / tilt]) * undb(over_hz(table))
    both = irfft(spectrum, SIZE)[:, :N]
    level = np.sqrt(np.mean(both.mean(axis=0) ** 2))
    return both / level * undb(db + 0.32 * wander(4.3))


def scene():
    """The oven fades out fast, then the board fades in."""
    tray = tray_scraping() + tray_bangs() + paper_snaps()
    roll = sawing_and_tearing() + crust_cracks() + board_knocks() + knife_laid_down()
    oven = room(tray, t60=0.093, wet_db=-7.5, per_s=7.92) + air(OVEN_AIR, -42.5)
    counter = room(roll, t60=0.055, wet_db=-5.0, per_s=8.0) + air(KITCHEN, -48)
    edit_s, fade_out_s, fade_in_s = 1.772, 0.018, 0.017
    oven_gain = np.clip((edit_s - T) / fade_out_s, 0, 1)
    counter_gain = np.clip((T - edit_s) / fade_in_s, 0, 1)
    return oven * oven_gain + counter * counter_gain


def record(dry):
    """Deep bass is thinned below about 140 Hz and the sound ends at 14.4 kHz."""
    low_cut_hz, top_hz = 137.5, 14400
    thin = signal.sosfilt(signal.butter(2, low_cut_hz, "high", fs=SR, output="sos"), dry)
    return signal.sosfilt(signal.ellip(8, .2, 70, top_hz, fs=SR, output="sos"), thin)


dry = scene()
out = record(dry)
to_wav(out)
```